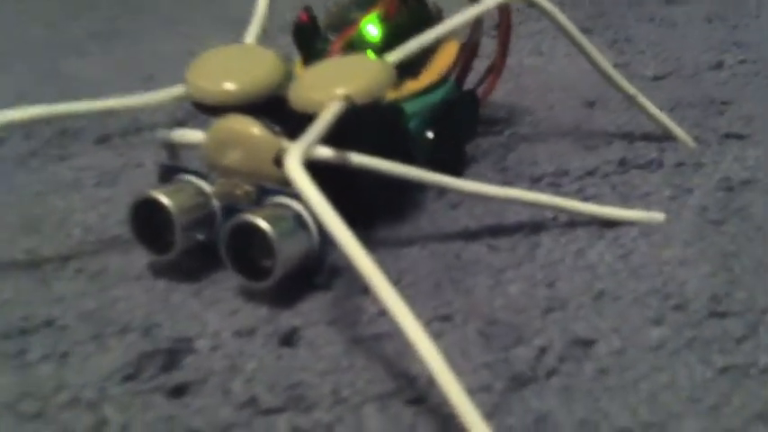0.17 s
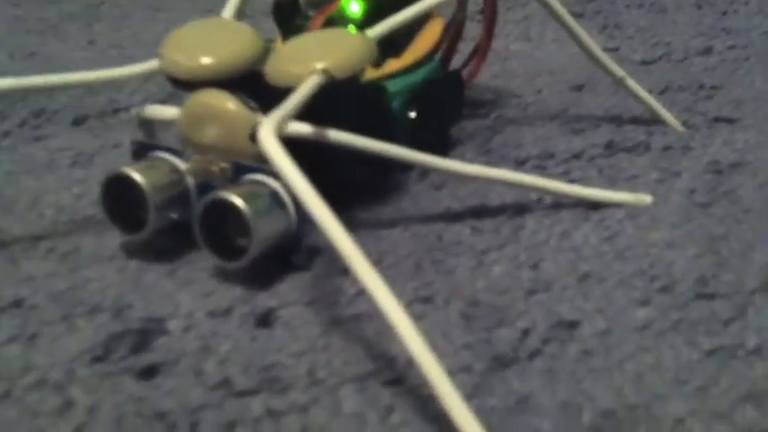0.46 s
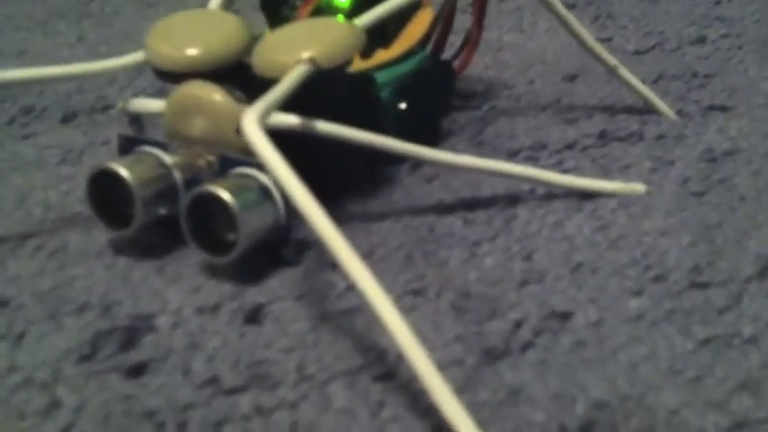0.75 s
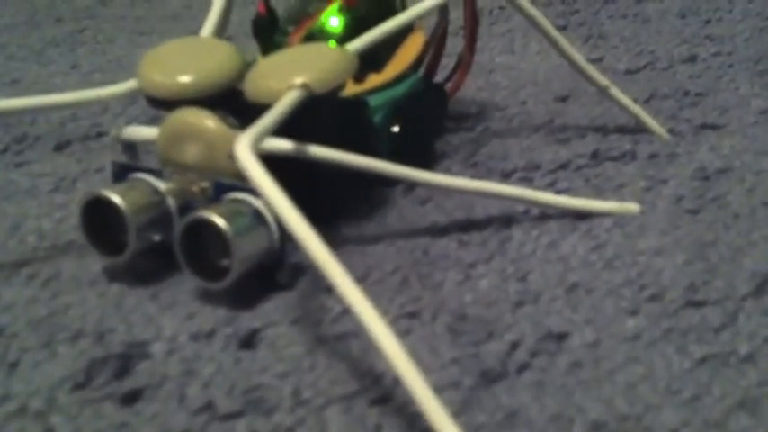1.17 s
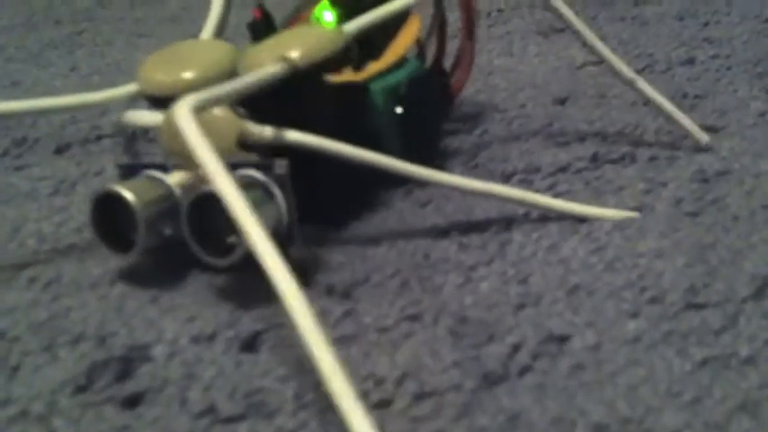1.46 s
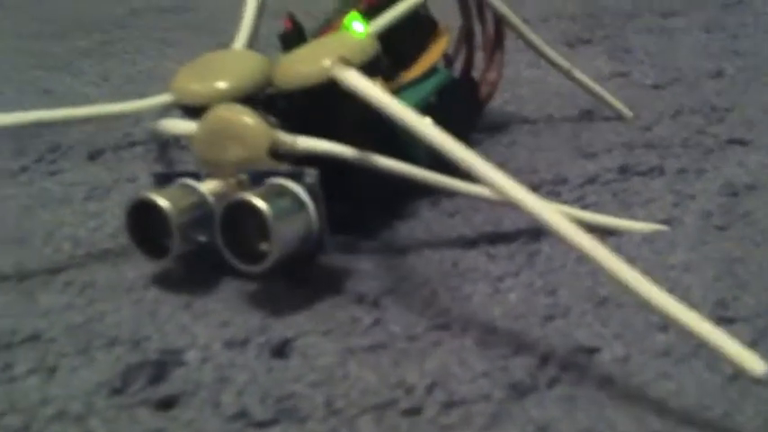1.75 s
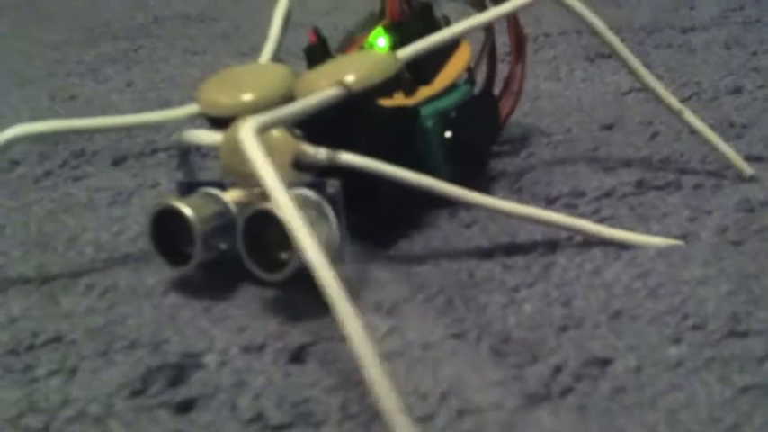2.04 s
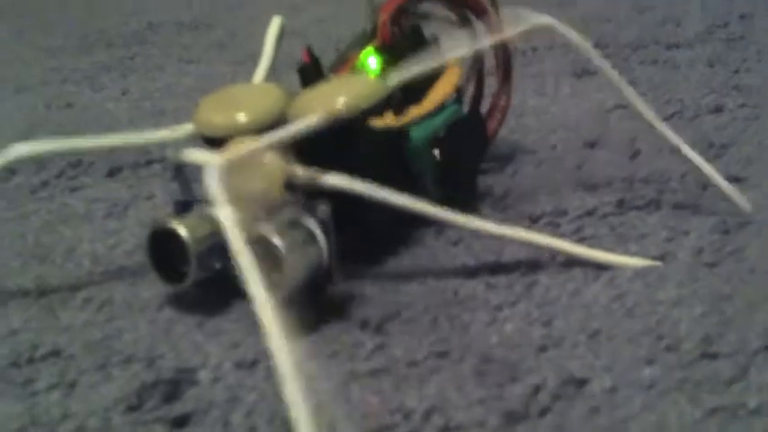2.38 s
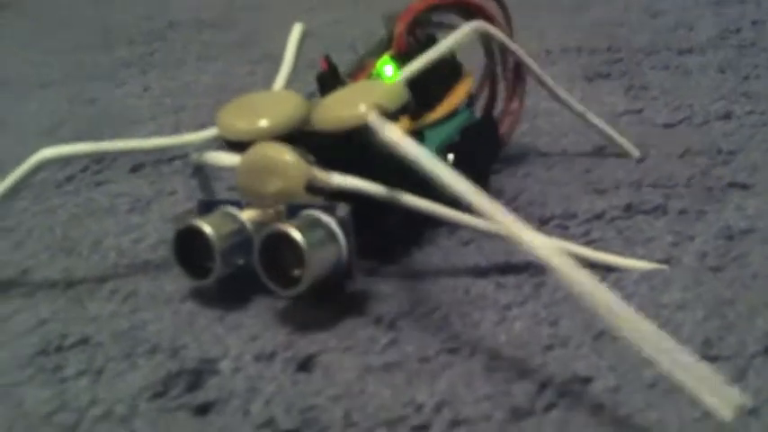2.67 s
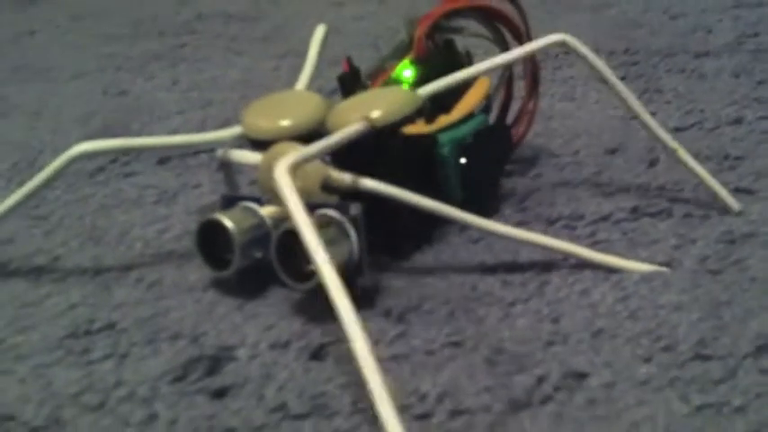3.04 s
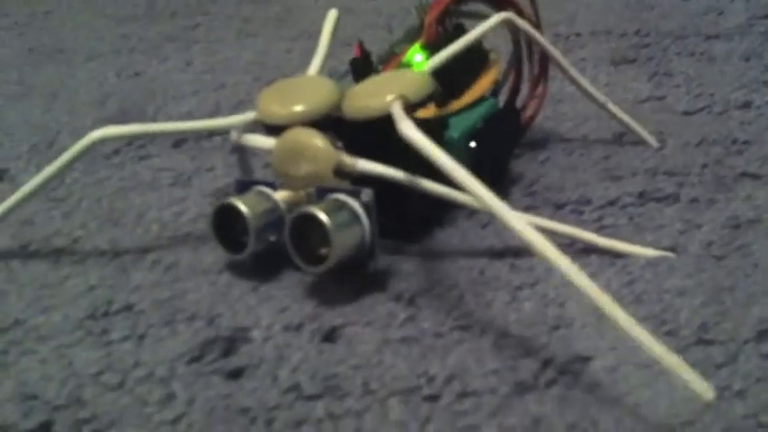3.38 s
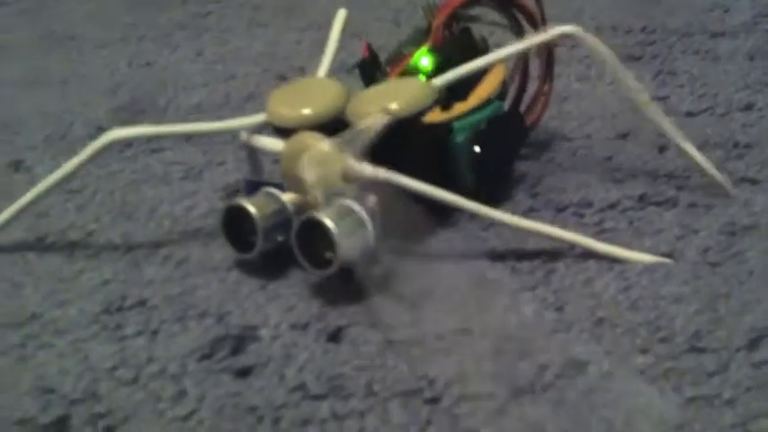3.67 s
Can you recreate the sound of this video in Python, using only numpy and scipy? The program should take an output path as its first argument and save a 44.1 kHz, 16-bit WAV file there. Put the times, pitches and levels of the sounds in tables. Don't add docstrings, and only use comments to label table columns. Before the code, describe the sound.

Close-up servo gear bursts, sharp and raspy, start after a quiet opening and repeat evenly to the end; tiny ticks, soft leg scuffs and dull knocks on carpet accompany them in a quiet, dry room.

```python
import sys
import numpy as np
from scipy import signal
from scipy.fft import rfft, irfft
from scipy.io import wavfile
from scipy.ndimage import uniform_filter1d

SR = 44100
rng = np.random.default_rng(int(sys.argv[2]) if len(sys.argv) > 2 else 0)


def wrap_up_sound(samples):
    columns = np.atleast_2d(samples).T
    tamed = np.clip(columns, -1, 1)
    steps = np.round(tamed * 32767).astype(np.int16)
    wavfile.write(sys.argv[1], SR, steps)


def makeup_ratio(level_db):
    decades = np.asarray(level_db, float) / 20
    return 10 ** decades


N = 168021

# start in seconds, level in dB rms.
OUT = [
    (1.878, -42),
    (2.397, -42),
    (2.937, -41.5),
    (3.477, -41.5),
]
# start in seconds, level in dB rms.
BACK = [
    (1.597, -40.5),
    (2.136, -40.5),
    (2.674, -40),
    (3.195, -40),
    (3.735, -38),
]
# start in seconds, level in dB rms.
FIRST = [
    (1.337, -40.5),
]
# seconds after its start, gain in dB.
OUT_EFFORT = [(0, -15), (.008, -3.5), (0.014, 2), (0.064, 1), (0.066, -7.5), (0.121, -12.5), (.126, -12.5),
              (.2, -24.5), (.255, -25), (.27, -56)]
# seconds after its start, gain in dB.
BACK_EFFORT = [(0, -16.5), (.014, -11), (0.034, -3.5), (0.066, -5.5), (0.084, -13), (0.104, -12.5),
               (.106, -20), (.27, -22.5), (.285, -20)]
# seconds after its start, gain in dB.
FIRST_EFFORT = [(0, -16), (.012, -3), (0.038, -2.5), (.066, -21), (.1, -28), (.255, -36), (.27, -60)]
# frequency in Hz, level in dB per Hz.
CASE_OUT = [(2590, -56), (4400, -17), (5810, -1), (6640, -9.5), (9250, -3), (12200, -9.5), (13700, -6),
            (15800, -8.5)]
# frequency in Hz, level in dB per Hz.
CASE_BACK = [(2590, -43), (4400, -13), (5330, -5), (7590, -7.5), (9560, -1), (10900, -11), (13500, -11.5),
             (15800, -8.5)]
# frequency in Hz, level in dB per Hz.
CASE_FIRST = [(2590, -67), (4400, -7), (7350, 1), (9010, 8), (13300, 1), (15800, -12)]
# frequency in Hz, level in dB per Hz.
CASE_TICK = [(2000, -26), (4400, -13.5), (5700, 4.5), (7500, -2), (9500, 1), (12000, -4), (13800, -4),
             (15800, -8)]
# centre in Hz, width in Hz, boost in dB.
RINGS = [(5780, 200, 0), (9350, 1700, 5)]
# centre in Hz, width in Hz, boost in dB.
BACK_RINGS = [(5740, 690, 2.5), (7470, 980, -3), (9500, 2100, 2), (14700, 400, -7), (15700, 400, -11)]
SLAM_CASE_DB = -8.5


def servos():
    out = effort(OUT, OUT_EFFORT)
    back = effort(BACK, BACK_EFFORT)
    first = effort(FIRST, FIRST_EFFORT)
    drive = out + back + first
    starts = np.sort([s for s, _ in [*OUT, *BACK, *FIRST]])
    throb = pulse_throb(starts, drive)
    slams, ticks = gear_slams(), hunting_ticks(starts)
    gears = meshes() * throb
    case = sheen(colour(gears * out + makeup_ratio(SLAM_CASE_DB) * slams, CASE_OUT, RINGS), drive)
    case += colour(gears * back, CASE_BACK, BACK_RINGS)
    case += colour(ticks, CASE_TICK)
    case += colour(gears * first, CASE_FIRST)
    return case + frame(drive, throb, slams, ticks)


def effort(swings, shape):
    t = np.arange(N) / SR
    s, db = np.transpose(shape)
    return sum(makeup_ratio(level + np.interp(t - start, s, db, left=-99, right=-99)) for start, level in swings)


PULSE_S = 0.02
THROB_DB, THROB_S = 13, 0.016


def pulse_throb(starts, drive):
    t = np.arange(N) / SR
    latest = starts[np.maximum(np.searchsorted(starts, t) - 1, 0)]
    since = (t - latest + 0.0031) % PULSE_S
    coasting = np.clip(1 - drive / makeup_ratio(-52.5), 0, 1)
    return makeup_ratio(-THROB_DB * coasting * (1 - np.exp(-since / THROB_S)))


SPLIT_HZ = [4790, 6940, 8300, 10100, 12050, 15000]
PATCH_DB, PATCH_PER_S = 2.5, 32


def meshes():
    middle = [(pair, "band") for pair in zip(SPLIT_HZ, SPLIT_HZ[1:])]
    parts = [(SPLIT_HZ[0], "low"), *middle, (SPLIT_HZ[-1], "high")]
    stages = [teeth(), teeth(), teeth()]
    total = np.zeros(N)
    for k, (hz, kind) in enumerate(parts):
        split = signal.butter(2, hz, kind, fs=SR, output="sos")
        total += makeup_ratio(PATCH_DB * drift(PATCH_PER_S)) * signal.sosfilt(split, stages[k % 3])
    return rms_one(total)


TEETH_PER_S, TOOTH_SPREAD_DB, FLUTTER_DB = 11000, 4, 2


def teeth():
    sizes = makeup_ratio(TOOTH_SPREAD_DB * np.minimum(rng.exponential(1, N), 4)) * rng.choice([-1, 1], N)
    contacts = rng.random(N) < TEETH_PER_S / SR
    return rms_one(sizes * contacts * makeup_ratio(FLUTTER_DB * drift(100)))


SHEEN_HZ, SHEEN_FULL_DB, SHEEN_FOLLOWS, SHEEN_LOSS_DB = 11300, -34, 0.56, 3


def sheen(x, drive):
    top = signal.sosfiltfilt(signal.butter(2, SHEEN_HZ, "high", fs=SR, output="sos"), x)
    gain = np.clip((drive / makeup_ratio(SHEEN_FULL_DB)) ** SHEEN_FOLLOWS, makeup_ratio(-SHEEN_LOSS_DB), 1)
    return x + top * (gain - 1)


# time in seconds, peak in dB.
SLAMS = [(1.346, -32), (1.366, -24.5), (1.6349, -27), (1.6574, -27), (1.694, -40), (1.89, -23),
         (1.9364, -40), (1.9946, -34), (2.1768, -40), (2.2364, -59), (2.4077, -23.5), (2.427, -25),
         (2.456, -33), (2.4972, -31), (2.5157, -32.5), (2.7056, -30), (2.7205, -25.5), (2.7736, -48),
         (2.9472, -26.5), (2.9957, -22), (3.016, -50), (3.0248, -33), (3.0552, -31.5), (3.2455, -25),
         (3.261, -23.5), (3.2954, -32.5), (3.487, -23), (3.5054, -23), (3.5349, -22), (3.785, -33)]
# time in seconds, peak in dB.
MORE_SLAMS = [(1.3493, -27), (1.3724, -38), (1.3844, -44), (1.6437, -23), (1.8984, -34), (1.9084, -33),
              (1.9124, -20), (2.1655, -27), (2.1864, -35), (2.1984, -43), (2.4175, -17.5), (2.4364, -34),
              (2.7384, -28), (2.7751, -38), (2.9634, -15), (2.9744, -28), (3.2144, -23), (3.2226, -26),
              (3.2274, -34), (3.497, -30), (3.511, -27), (3.521, -27), (3.7554, -21.5), (3.7666, -37)]
SLAM_S, MORE_SLAM_DB = 0.0012, -5.5


def gear_slams():
    return bursts(SLAMS, SLAM_S) + makeup_ratio(MORE_SLAM_DB) * bursts(MORE_SLAMS, SLAM_S)


# time in seconds, peak in dB.
TICKS = [(1.4168, -48), (1.4586, -48), (1.584, -54), (1.7983, -48.5), (1.8178, -51), (1.8384, -47),
         (1.8582, -49), (2.0782, -54), (2.257, -48), (2.297, -51), (2.358, -49), (2.378, -55),
         (2.4755, -39), (2.5371, -43), (2.554, -44), (2.574, -44), (2.5945, -45.5), (2.6587, -47.5),
         (2.8374, -47), (2.8975, -45.5), (3.0769, -44), (3.095, -43), (3.1175, -50), (3.3976, -43),
         (3.4565, -49), (3.5634, -40), (3.5767, -39), (3.595, -42), (3.6337, -41.5), (3.698, -48)]
# time in seconds, peak in dB.
MORE_TICKS = [(1.4374, -53), (1.4624, -54), (1.4804, -52), (1.4844, -50), (1.5044, -50), (1.5445, -52),
              (1.5638, -50), (1.7244, -52), (1.74, -50), (1.7604, -52), (1.7814, -51), (2.062, -46),
              (2.122, -52), (2.3176, -49), (2.3351, -45), (2.7984, -42), (2.8185, -47), (2.8224, -48),
              (2.8574, -48), (2.8785, -54), (2.9173, -52), (2.9357, -40), (3.1434, -49), (3.1612, -50),
              (3.1814, -43), (3.3174, -48), (3.3574, -52), (3.3817, -48), (3.417, -43), (3.6424, -49),
              (3.662, -50), (3.721, -45)]
TICK_S, TICK_DB, MORE_TICK_DB = 0.0007, -1, -5.5
TWITCH_DB, TWITCH_SPREAD_DB, TWITCH_S, SECOND_SERVO_S = -62.5, 2.5, 0.0019, 0.0048


def hunting_ticks(starts):
    pulses = (starts[:, None] + PULSE_S * np.arange(13)).ravel()
    luck = rng.standard_normal((len(pulses), 2))
    twitches = []
    for s, row in zip(pulses, luck):
        for k in range(2):
            twitches.append((s + k * SECOND_SERVO_S, TWITCH_DB + TWITCH_SPREAD_DB * row[k]))
    clear = makeup_ratio(TICK_DB) * bursts(TICKS, TICK_S)
    faint = makeup_ratio(MORE_TICK_DB) * bursts(MORE_TICKS, TICK_S)
    return clear + faint + bursts(twitches, TWITCH_S)


CONTACT_CUT_HZ, SNAP = 13000, 2.6


def bursts(rows, decay_s):
    marks = np.zeros(N + SR)
    for s, db in rows:
        marks[int(s * SR)] += makeup_ratio(db)
    r = np.exp(-1 / (decay_s * SR))
    rise = np.exp(-1 / (0.00028 * SR))
    shape = signal.lfilter([1 - rise], np.convolve([1, -r], [1, -rise]), marks + 1e-18)[:N]
    soften = signal.butter(2, CONTACT_CUT_HZ, fs=SR, output="sos")
    return signal.sosfilt(soften, shape * rng.standard_normal(N) + SNAP * marks[:N])


# frequency in Hz, level in dB per Hz.
FRAME = [(900, -8.5), (1500, -2.5), (2200, -5), (3300, -0.5), (4300, -2), (5200, -12)]
# centre in Hz, width in Hz, boost in dB.
FRAME_RINGS = [(2204, 310, 8.2), (3300, 1300, 3.4)]
FRAME_DB, FRAME_FOLLOWS, FRAME_SLAM_DB, FRAME_TICK_DB = -40, 0.48, -34.5, -10


def frame(drive, throb, slams, ticks):
    shake = makeup_ratio(FRAME_DB + 2.3 * drift(51)) * teeth() * throb * drive ** FRAME_FOLLOWS
    shake += makeup_ratio(FRAME_SLAM_DB) * slams + makeup_ratio(FRAME_TICK_DB) * ticks
    return colour(shake, FRAME, FRAME_RINGS)


# start in seconds, length in seconds, level in dB rms.
DRAGS = [
    (1.373, 0.041, -64),
    (1.617, 0.057, -66),
    (2.143, 0.078, -57.5),
    (2.407, 0.059, -63),
    (2.684, 0.064, -56),
    (2.96, 0.028, -69.5),
    (3.029, 0.044, -61.5),
    (3.201, 0.071, -58.5),
    (3.739, 0.078, -58.5),
    (.1, 0.11, -67.5),
]
# frequency in Hz, level in dB per Hz.
PILE = [(250, -7), (600, -4), (1000, -5), (1600, -17), (2600, -18.5), (4000, -21)]
# time in seconds, peak in dB, pitch in Hz.
KNOCKS = [(.565, -60, 1070), (.59, -64, 990), (.608, -61, 1110), (.937, -59, 1090), (1.377, -54, 940),
          (1.379, -55, 1080), (2.157, -57.5, 704), (2.189, -52, 856), (2.737, -53, 1430),
          (3.256, -54.5, 1510), (1.645, -51.5, 3040), (1.697, -60, 2300), (1.995, -59, 3520),
          (2.514, -52.5, 3500), (2.967, -68, 3300)]
SCUFF_DB, KNOCK_S, KNOCK_WIDTH_HZ = 2.5, 0.0022, 195


def legs():
    t = np.arange(N) / SR
    swell = np.zeros(N)
    for s, length, db in DRAGS:
        swell += makeup_ratio(db) * np.sin(np.pi * np.clip((t - s) / length, 0, 1)) ** 0.35
    out = colour(swell * rng.standard_normal(N) * makeup_ratio(SCUFF_DB * drift(100)), PILE)
    noise = rng.standard_normal(N)
    r = np.exp(-np.pi * KNOCK_WIDTH_HZ / SR)
    for s, db, hz in KNOCKS:
        age = np.maximum(t - s, 0) / KNOCK_S
        ring = [1, -2 * r * np.cos(2 * np.pi * hz / SR), r * r]
        out += makeup_ratio(db + 26.5) * signal.lfilter([1 - r, 0, r - 1], ring, noise * age * np.exp(-age))
    return out


ROOM_DB, ROOM_T60_S = -16, 0.12


def room(x):
    age = np.arange(SR // 2) / SR
    tail = rng.standard_normal(SR // 2) * makeup_ratio(-60 * age / ROOM_T60_S) * (age > 0.003)
    return makeup_ratio(ROOM_DB) * signal.fftconvolve(x, tail / np.sqrt(np.sum(tail ** 2)))[:N]


# frequency in Hz, level in dB per Hz.
RUMBLE = [(15, -89), (25, -26), (48, -39), (71, -26), (173, -2), (248, -8.5), (413, -16.5), (591, -23.5),
          (900, -27.5), (1170, -66.5), (1980, -120)]
# centre in Hz, width in Hz, boost in dB.
DUCT = [(195.6, 28, 2.5), (420, 25, 7.5), (523.2, 8.3, 9.5)]
# time in seconds, level in dB rms.
RUSTLE = [(0, -73), (.15, -70.5), (.6, -74.5), (1.0, -91), (1.3, -101), (3.81, -87)]
# frequency in Hz, level in dB per Hz.
HISS = [(530, -21), (900, -6.5), (1200, -7.5), (1870, -10), (2910, -11), (3320, -10.5), (15800, -15.5)]
RUMBLE_DB, HISS_DB = -55.5, -67.5


def air():
    rumble = colour(rng.standard_normal(N), [*RUMBLE, (1500, -62.5)], DUCT) * makeup_ratio(0.48 * drift(4.6))
    rustle = colour(rng.standard_normal(N), [(500, -23), (1000, -2.0), (3500, 3), (6000, -6.5)])
    rustle *= makeup_ratio(np.interp(np.arange(N) / SR, *np.transpose(RUSTLE)))
    hiss = colour(rng.standard_normal(N), HISS)
    return makeup_ratio(RUMBLE_DB) * rumble + rustle + makeup_ratio(HISS_DB) * hiss


def rms_one(x):
    return x / np.sqrt(np.mean(x ** 2) + 1e-20)


def drift(rate):
    r = np.exp(-2 * np.pi * rate / SR)
    return rms_one(signal.lfilter([1], [1, -2 * r, r * r], rng.standard_normal(N + SR))[SR:])


def colour(x, points, peaks=()):
    size = 8192
    hz = np.arange(size // 2 + 1) * SR / size + 1e-3
    f, db = np.transpose(points)
    shape = np.interp(np.log(hz), np.log(f), db, left=db[0] - 15.0)
    for centre, width, boost in peaks:
        shape = shape + boost / (1 + (2 * (hz - centre) / width) ** 2)
    cepstrum = irfft(shape * np.log(10) / 20)
    cepstrum[1:size // 2] *= 2
    cepstrum[size // 2 + 1:] = 0
    response = irfft(np.exp(rfft(cepstrum)))
    return signal.fftconvolve(x, response / np.sqrt(np.sum(response ** 2)))[:N]


def scene():
    robot = servos() + legs()
    return (robot + room(robot) + air())[None]


STARVED_HZ = [3500, 5000, 6800, 8500, 10500, 13000, 17000]
DUCK_DB, DUCK_LEAD_S, DUCK_S, BRAKE_S = -8, 0.002, 0.0035, 0.109
DROPOUT_DB, DROPOUTS_PER_S = 10, 45


def starve(dry):
    t = np.arange(N) / SR
    edges = [s - DUCK_LEAD_S for s, _ in [*OUT, *BACK, *FIRST]] + [s + BRAKE_S for s, _ in BACK]
    walking = t > FIRST[0][0] - 0.02
    shared = drift(DROPOUTS_PER_S)
    out = dry
    for k, pair in enumerate(zip(STARVED_HZ, STARVED_HZ[1:])):
        band = signal.sosfiltfilt(signal.butter(2, pair, "band", fs=SR, output="sos"), dry)
        ducks = sum(rng.random() ** 0.5 * np.exp(-((t - s) / DUCK_S) ** 4) for s in edges)
        ahead = ducks * (k + 1) / 4
        gaps = np.clip(0.4 * shared + 0.9 * drift(DROPOUTS_PER_S) - 1.3 + 0.13 * k, 0, 1) * walking
        power = uniform_filter1d(band ** 2, size=130)
        quiet = uniform_filter1d(1.0 * (power < makeup_ratio(2 * -68)), size=60)
        out = out + band * (makeup_ratio(quiet * (DUCK_DB * ahead - DROPOUT_DB * gaps)) - 1)
    return out


def band_limit(x):
    return signal.sosfilt(signal.butter(12, 15900, fs=SR, output="sos"), x)


def record(dry):
    cut = signal.ellip(12, 0.3, 80, 15750, fs=SR, output="sos")
    out = signal.sosfilt(cut, starve(dry))
    return band_limit(out)


dry = scene()
out = record(dry)
wrap_up_sound(out)
```